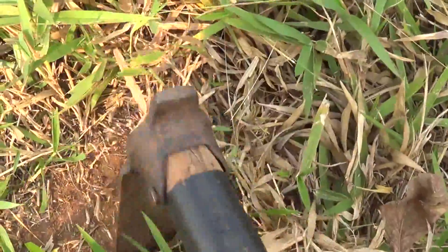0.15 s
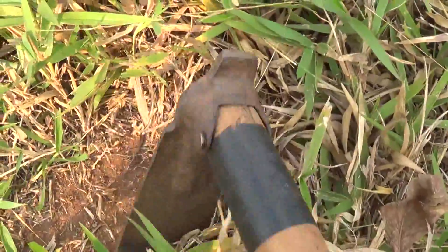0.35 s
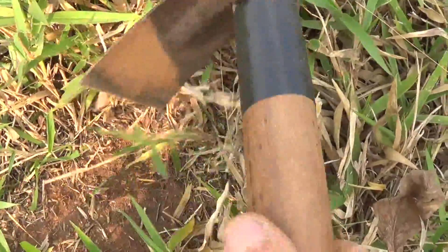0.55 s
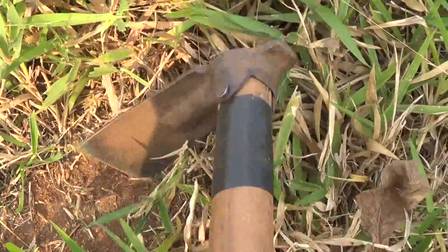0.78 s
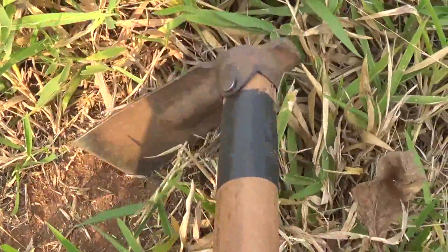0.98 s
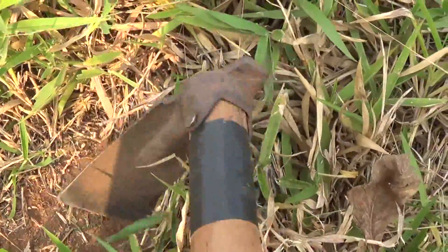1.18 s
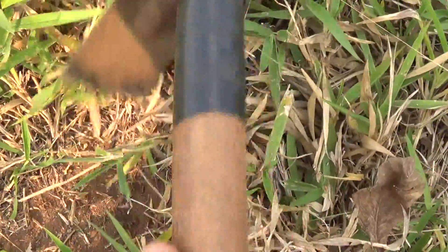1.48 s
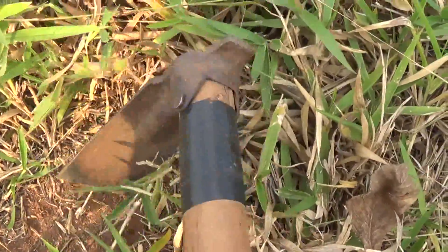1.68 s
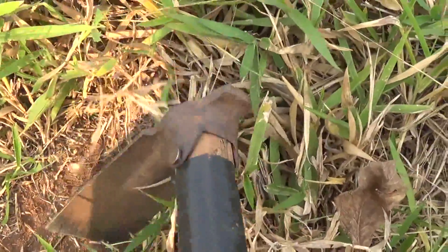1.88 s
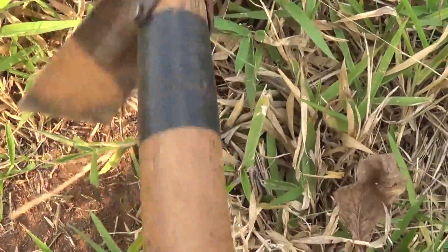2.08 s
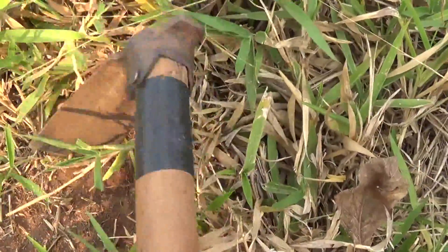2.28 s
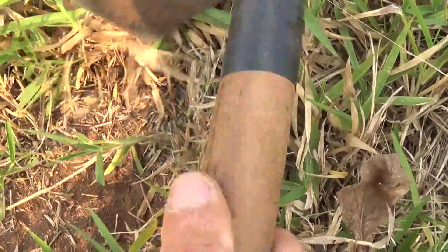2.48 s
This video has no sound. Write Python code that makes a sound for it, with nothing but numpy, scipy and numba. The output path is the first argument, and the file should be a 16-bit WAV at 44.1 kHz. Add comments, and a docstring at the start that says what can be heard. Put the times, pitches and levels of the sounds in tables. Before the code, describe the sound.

Steel hoe blade strikes and drags through gritty soil, with dry grass rustling and snapping between strokes

```python
"""The steel blade of a hand hoe chops into dry grassy soil and is dragged back, heard close by. Knocks and grit
ring the blade, a set of fading tones that clinging soil damps and detunes. The soil cracks and crunches in
coloured noise and thuds in short low tones. Dry stalks rustle and snap in bright noise, with a few light knocks
among the snaps; steady noise gives the faint hum and hiss of open air."""
import sys
import numpy as np
from scipy import signal
from scipy.io import wavfile
from scipy.ndimage import uniform_filter1d
from numba import njit

SR = 44100
rng = np.random.default_rng(int(sys.argv[2]) if len(sys.argv) > 2 else 0)


def level_to_linear(level):
    """Convert decibel levels to linear amplitude factors, elementwise."""
    exponent = np.asarray(level, float) / 20
    return 10 ** exponent


def master(y):
    """Save y as 16-bit WAV."""
    cut = np.clip(np.atleast_2d(y).T, -1, 1)
    pcm = np.round(cut * 32767)  # scale
    wavfile.write(sys.argv[1], SR, pcm.astype(np.int16))


N = 116865  # length [samples]

# tones of the free blade, before soil detunes them: (frequency [Hz])
BLADE_HZ = [583, 705, 790, 1110, 1295, 1650, 1745, 2135, 2628, 3565, 3625, 4300, 5978, 6500, 6700, 7035,
            7790, 8585, 9230, 9806]
# the same tones in the same order: (relative level [dB], time to fade by 60 dB when free [s])
BLADE_TONES = [(-8, 0.33), (-12.5, 0.25), (-12.5, 0.096), (-7.5, 0.089), (-12, 0.039), (-4.5, 0.089),
               (-9.5, 0.065), (-5, 0.061), (-3.5, 0.043), (-3, 0.11), (-3, 0.14), (4, 0.014), (-10.5, 0.57),
               (0, 0.025), (1.5, 0.024), (-10.5, 0.061), (-4.5, 0.062), (2.5, 0.041), (3, 0.028),
               (-9, 0.12)]
# knocks of the edge on clods and stones: (time [s], relative level [dB], tone that rings most [Hz])
KNOCKS = [(0.028, -2, 1095), (.037, -11.5, 3530), (.053, -7, 3620), (.069, -11, 4300), (0.0787, -13, 7790),
          (0.0909, -4, 6920), (0.1067, -7, 7790), (.163, -10, 3520), (0.7266, -5, 5978), (0.7615, -5, 5978),
          (.785, -11.5, 2135), (0.798, -16, 2135), (.818, -18, 4300), (1.0375, -9.5, 2628),
          (1.0613, -8, 2628), (1.0682, -11, 3625), (1.0834, -11, 3625), (1.1505, -9, 3300),
          (1.5749, -1, 5978), (1.6072, -6, 1820), (1.623, -6.5, 2135), (1.6545, -5, 1660),
          (1.7225, -5, 1790), (1.76, -12, 2135), (1.835, -4.5, 1640), (2.2917, -4.5, 2135),
          (2.3092, -6, 9460), (2.3316, -3, 705), (2.357, -5.5, 4300), (2.3865, -8, 9350)]
# force of each drag through the soil, one list a drag: (time [s], relative level [dB])
DRAGS = [
    [(0, -43.5), (.025, -21.5), (.055, -22), (.125, -27), (.145, -24.5), (.22, -31.5), (.31, -52.5)],
    [(.76, -27.5), (.825, -33.5), (.84, -100)],
    [(1.0, -38), (1.05, -30.5), (1.11, -18.5), (1.13, -33), (1.16, -20), (1.185, -31), (1.225, -34),
     (1.26, -82)],
    [(1.575, -26.5), (1.635, -21.5), (1.68, -39), (1.715, -27), (1.76, -19), (1.805, -30.5), (1.835, -22),
     (1.93, -31), (1.99, -38.5), (2.01, -52)],
    [(2.29, -41), (2.39, -27), (2.41, -44)],
]
# tones favoured by the part of the edge in contact, one a drag: (frequency [Hz])
DRAG_FAVOURS_HZ = [2630, 2370, 5978, 3600, 3625]
# extra fading of the blade in the soil, one a drag: (rate [dB per s])
BURIED_DB_PER_S = [-500, -100, -100, -200, -100]
# moments when the soil grips the blade and stills it: (time [s])
GRIPS = [0.126, 0.826, 1.178, 1.668, 1.991]
# colour of cracking and crunching soil: (frequency [Hz], relative level [dB])
SOIL_COLOUR = [(200, -26.5), (400, -12.5), (730, -2.5), (970, -20.5), (2160, 3), (3200, -15.5),
               (4400, -2.5), (7400, -20.5), (10000, -7.5)]
# dull thumps of soil and handle: (time [s], relative level [dB], pitch [Hz])
THUDS = [(0.169, -30.5, 183), (0.726, -24, 390), (1.492, -33, 435), (1.574, -14.5, 403),
         (1.658, -28.5, 230), (2.293, -23.5, 416)]
# colour of the open air: (frequency [Hz], relative level [dB])
AIR_COLOUR = [(25, -33), (100, -1), (250, -2), (600, -12), (11000, -19.5)]
# rustling grass, one list a stretch: (time [s], relative level [dB])
RUSTLES = [
    [(.26, -45.5), (.44, -48.5), (.475, -28.5), (.51, -46), (.535, -33), (.62, -39.5), (.74, -36)],
    [(.84, -59.5), (1.01, -38)],
    [(1.23, -43.5), (1.41, -40), (1.44, -23), (1.49, -40), (1.56, -21.5), (1.575, -21)],
    [(1.99, -59), (2.08, -37.5), (2.13, -47), (2.25, -30.5), (2.29, -27)],
    [(2.42, -45.5), (2.54, -23.5), (2.585, -36), (2.63, -19), (2.65, -13.5)],
]
# dry stalks snap, and a few light knocks sound in the same bright puffs: (time [s], relative level [dB])
SNAPS = [(0.5834, -13.5), (0.5929, -16.5), (0.7012, -23), (.84, -16), (0.8993, -30.5), (0.962, -18.5),
         (1.0068, -21), (1.441, -15), (2.1904, -23.5), (2.219, -25)]
# colour of dry stalks, and of the bright ticks of knocks: (frequency [Hz], relative level [dB])
GRASS_COLOUR = [(150, -52), (500, -12), (2000, 2.5), (10000, 5)]
# band limit of the phone: (frequency [Hz], gain [dB])
PHONE_BAND = [(11000, 1), (11150, -28), (12000, -51), (14000, -110)]


def evened(x):
    """Scales a signal to an rms of one."""
    return x / np.sqrt(np.mean(x ** 2) + 1e-20)


def smooth_noise(length_s, passes=1):
    """Slow random wander: noise averaged over a short time, with an rms of one."""
    x = rng.standard_normal(N)
    for _ in range(passes):
        x = uniform_filter1d(x, round(length_s * SR))
    return evened(x)


def colour(x, points, even=True):
    """Filters without pre-echo to a spectrum table; even keeps the power of white noise."""
    f, db = np.transpose(points)
    hz = abs(np.fft.fftfreq(4096, 1 / SR))
    curve_db = np.interp(np.log(hz + 1), np.log(f + 1), db)
    log_gain = np.log(level_to_linear(np.maximum(curve_db, -100)))
    # minimum phase: the filter answers as early as it can
    taps = np.fft.ifft(np.exp(np.conj(signal.hilbert(log_gain)))).real[:2048]
    if even:
        taps = taps / np.linalg.norm(taps)
    return signal.oaconvolve(x, taps[None], axes=-1)[..., :N]


def level(tables):
    """Gain along curves of (time, dB), nearly silent between them."""
    t = np.arange(N) / SR
    return sum(level_to_linear(np.interp(t, *np.transpose(rows), left=-120, right=-120)) for rows in tables)


def grains(per_s, spread_db, clump_s, clump_db, channels=2):
    """Random clicks of uneven size that swell and thin out in clumps."""
    clumps = smooth_noise(clump_s, passes=2)
    size = level_to_linear(spread_db * np.minimum(rng.exponential(1, N), 4))
    size = size * (rng.random(N) < per_s / SR)
    return evened(size * level_to_linear(clump_db * clumps) * rng.standard_normal((channels, N)))


def bursts(times, gains, length_s):
    """A puff of noise at each time: a sharp rise, then an exponential fade."""
    t = np.arange(1200) / SR
    shape = np.minimum(t / 0.0007, 1) * np.exp(-t / length_s)
    out = np.zeros((2, N + len(t)))
    for s, gain in zip(times, gains):
        start = round(s * SR)
        out[:, start:start + len(t)] += gain * shape * rng.standard_normal((2, len(t)))
    return out[:, :N]


def patchy(x, patch_db):
    """Every clod or stalk has its own colour: short random patches over time and frequency."""
    z = signal.stft(x, nperseg=128, noverlap=96)[2]
    patches = rng.standard_normal(z.shape[1:])
    patches = uniform_filter1d(patches, size=3, axis=0)  # across frequency
    patches = uniform_filter1d(patches, size=10, axis=1)  # across time
    return signal.istft(z * level_to_linear(patch_db * evened(patches)), nperseg=128, noverlap=96)[1][:, :N]


def favour(hz, centre_hz, boost_db, octaves):
    """Gain of a tone, raised where it lies near a favoured frequency."""
    return level_to_linear(boost_db * np.exp(-(np.log2(hz / centre_hz) / octaves) ** 2))


@njit
def ring_down(drive, turn, hold):
    """One blade tone: a spinning number that fades each sample, damped and detuned by hold."""
    out, state = np.zeros(len(drive)), 0j
    for n in range(len(drive)):
        state = state * turn * hold[n] + drive[n]
        out[n] = state.imag
    return out


def soil_hold():
    """Soil clinging in each drag damps and detunes the blade; grips still it. Also numbers the drags."""
    hold, stroke = np.ones(N, complex), np.zeros(N, int)  # stroke 0: no drag
    sway = 0.08 * smooth_noise(0.03)  # detuning [Hz per dB per s of damping]
    for k, (rows, db_per_s) in enumerate(zip(DRAGS, BURIED_DB_PER_S)):
        span = slice(round(rows[0][0] * SR), round(rows[-1][0] * SR))
        detune = np.exp(2j * np.pi * db_per_s * sway[span] / SR)
        hold[span] = level_to_linear(db_per_s / SR) * detune
        stroke[span] = k + 1
    grip_s, grip_db = 0.052, -61  # length of a grip, extra fade over it
    for grip in GRIPS:
        hold[round(grip * SR):round((grip + grip_s) * SR)] = level_to_linear(grip_db / (grip_s * SR))
    return hold, stroke


def blade():
    """Grit and knocks ring the blade's tones; every contact spot favours other tones."""
    s, knock_db, best_hz = np.transpose(KNOCKS)
    at = np.round(s * SR).astype(int)
    hold, stroke = soil_hold()
    edge_hz = np.r_[1., DRAG_FAVOURS_HZ]  # 1 Hz outside the drags: favours no tone
    spot = np.clip(rng.standard_normal((len(s), len(BLADE_TONES))), -2, 1.5)
    # the rustling grass drives the blade faintly too
    force = level_to_linear(-28) * (level(DRAGS) + level_to_linear(-16.5) * level(RUSTLES))
    grit = force * grains(1500, 2.5, 0.008, 2.5, channels=len(BLADE_TONES))
    out = np.zeros((2, N))
    for k, (hz, (db, t60)) in enumerate(zip(BLADE_HZ, BLADE_TONES)):
        drive = grit[k] * favour(hz, edge_hz, 6.2, 0.21)[stroke]
        knock = level_to_linear(knock_db - 22.5 + 4 * spot[:, k])
        drive[at] += knock * favour(hz, best_hz, 14.9, 0.11)
        turn = level_to_linear(-60 / (t60 * SR)) * np.exp(2j * np.pi * hz / SR)
        side = (-1) ** k  # alternate tones lean to opposite sides
        out += level_to_linear(db) * ring_down(drive, turn, hold) * np.array([[1], [side]])
    return signal.sosfilt(signal.butter(4, 350, "high", fs=SR, output="sos"), out)


def crunch():
    """The drag breaks the soil into a dense stream of clumped clicks."""
    return level_to_linear(-6) * level(DRAGS) * grains(4000, 2.5, 0.008, 2.5)


def cracks():
    """Each knock cracks the soil in a short puff of noise."""
    s, knock_db, _ = np.transpose(KNOCKS)
    return bursts(s, level_to_linear(knock_db - 6.5), 0.0036)


def ticks():
    """Each knock starts with a bright tick, much stronger when the knock is hard."""
    s, knock_db, _ = np.transpose(KNOCKS)
    return colour(bursts(s, level_to_linear(2 * knock_db - 7), 0.0007), GRASS_COLOUR)


def thuds():
    """Soil and handle thump in low tones that fade by 60 dB in 0.073 s."""
    out, t = np.zeros(N + 4000), np.arange(4000) / SR
    for when, db, hz in THUDS:
        envelope = level_to_linear(db - 60 * t / 0.073) * np.minimum(t / 0.0028, 1)
        out[round(when * SR):][:len(t)] += envelope * np.sin(2 * np.pi * hz * t)
    return out[:N]


def soil():
    """Crunch and cracks share the patchy colour of the soil; ticks and thuds are added."""
    return patchy(colour(cracks() + crunch(), SOIL_COLOUR), 3.87) + ticks() + thuds()


def air():
    """Low hum and hiss of the open air: steady coloured noise."""
    return level_to_linear(-49) * evened(colour(rng.standard_normal((2, N)), AIR_COLOUR))


def grass():
    """Dry stalks rub in a dense crackle; some snap, and a few light knocks sound, in louder puffs."""
    s, db = np.transpose(SNAPS)
    rustle = level(RUSTLES) * grains(9000, 3.36, 0.0073, 2.1)
    snaps = bursts(s, level_to_linear(db), 0.0017)
    return patchy(colour(rustle + snaps, GRASS_COLOUR), 2.9)


def spread(pair):
    """Near-mono picture: a middle signal and a faint side signal, leaning a little left."""
    middle, side = pair
    lean = level_to_linear(np.array([[0.34], [-0.34]]))  # left and right [dB]
    return lean * (middle + level_to_linear(-13.5) * np.array([[1], [-1]]) * side)


def scene():
    """All sources in one place before the microphones."""
    return spread(blade() + soil() + air() + grass())


def band_limit(x):
    """A steep low-pass at the top of the band."""
    return signal.sosfilt(signal.butter(12, 12360, fs=SR, output="sos"), x)


def record(dry):
    """Soft overload rounds off the peaks, then the phone limits the band."""
    ceiling = 0.5  # level the peaks bend towards
    overloaded = ceiling * np.tanh(dry / ceiling)
    return band_limit(colour(overloaded, PHONE_BAND, even=False))


dry = scene()
out = record(dry)
master(out)
```